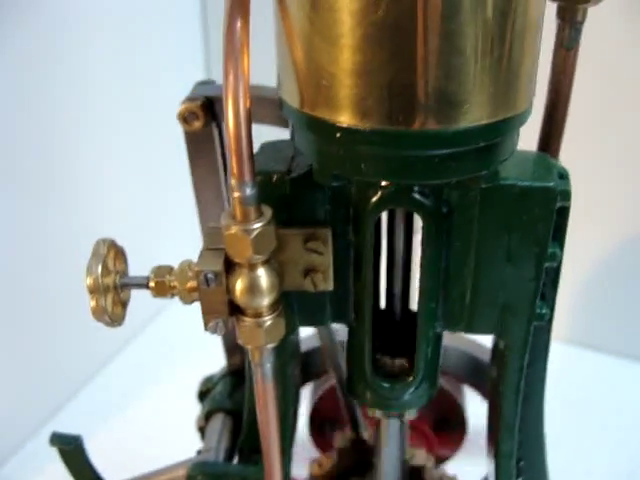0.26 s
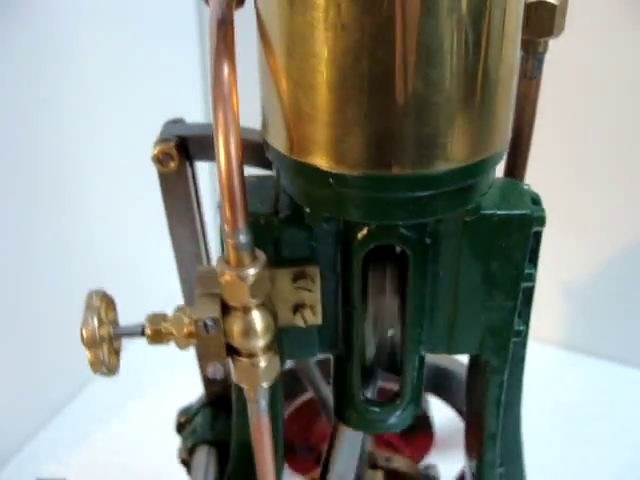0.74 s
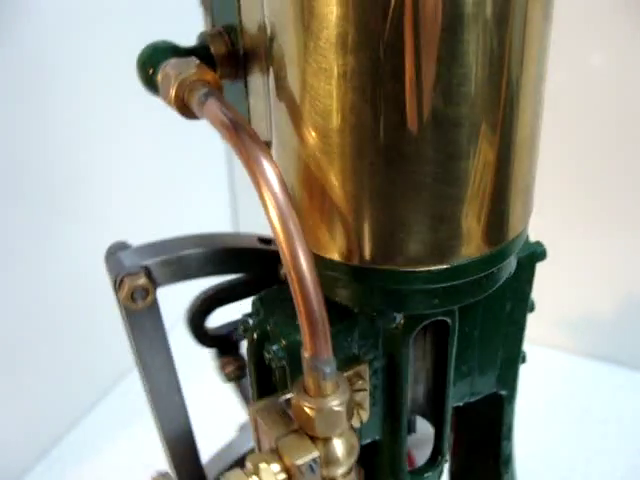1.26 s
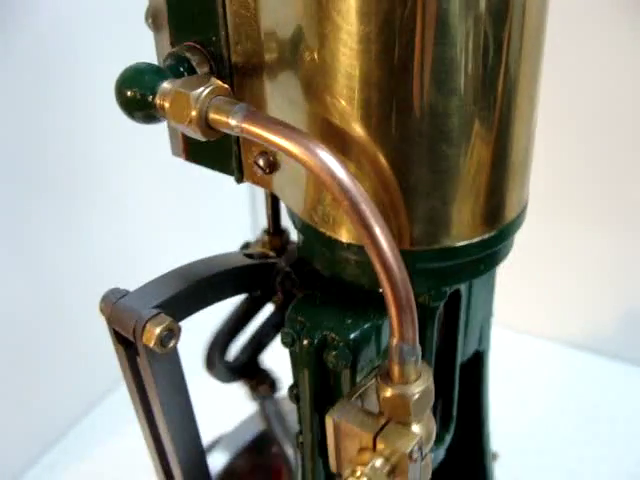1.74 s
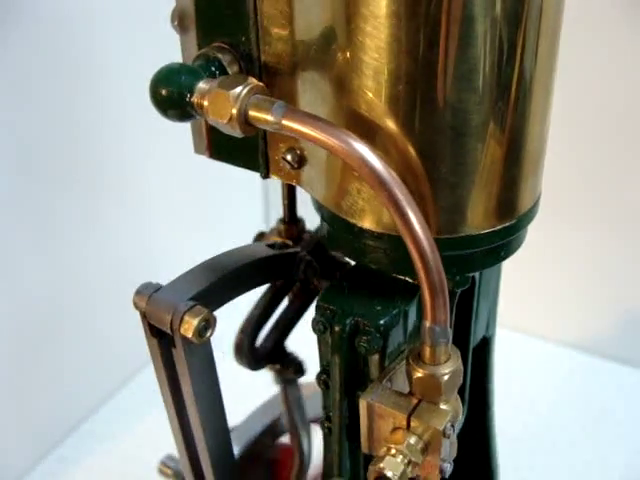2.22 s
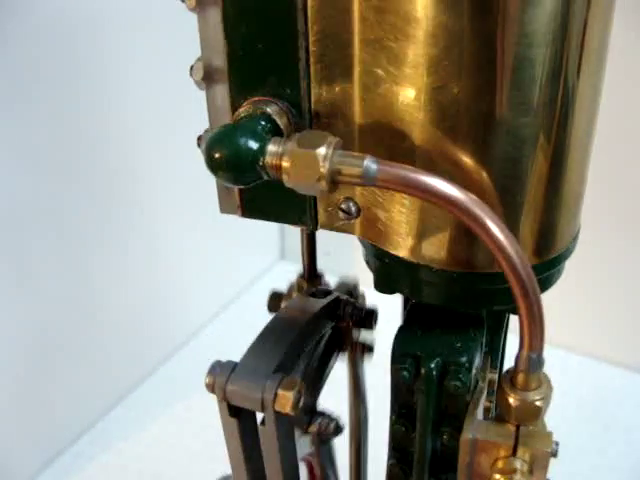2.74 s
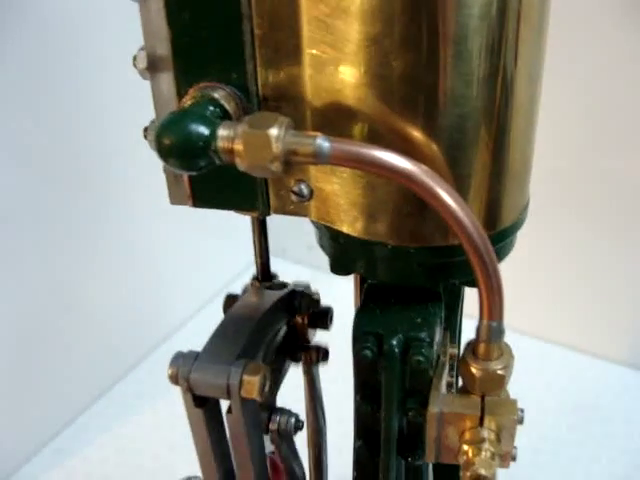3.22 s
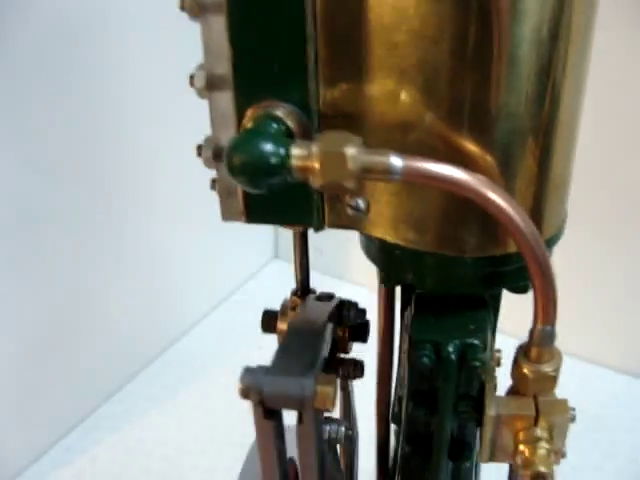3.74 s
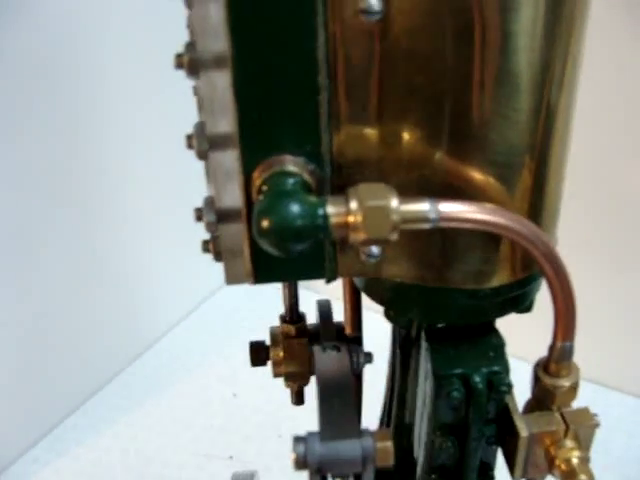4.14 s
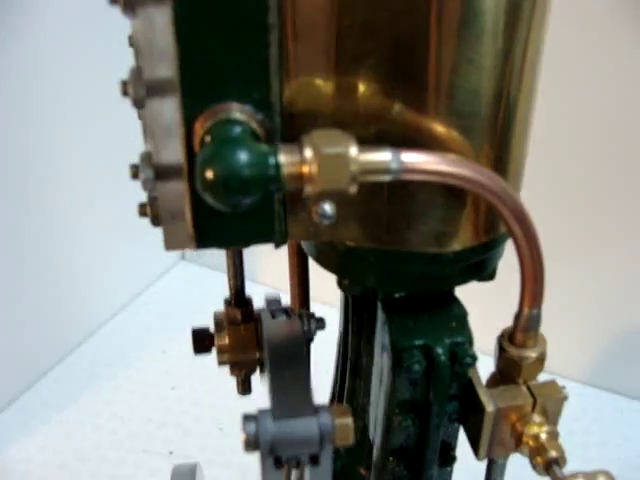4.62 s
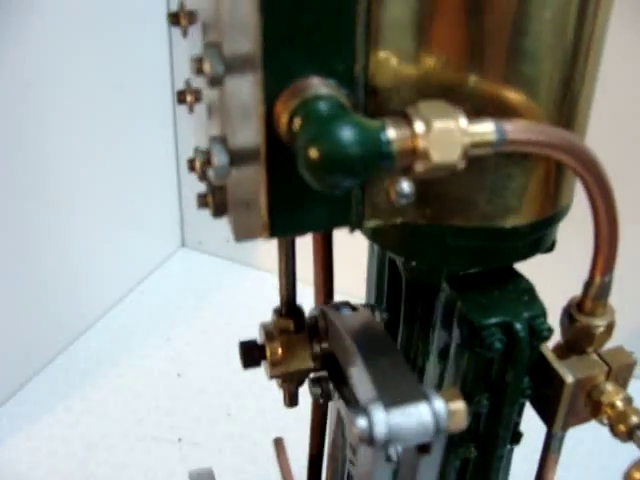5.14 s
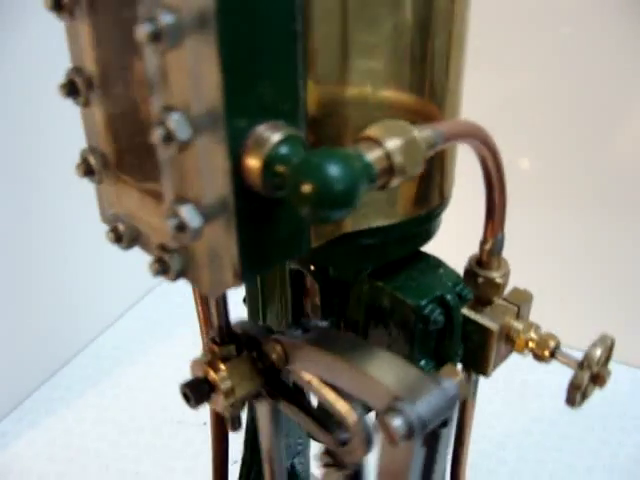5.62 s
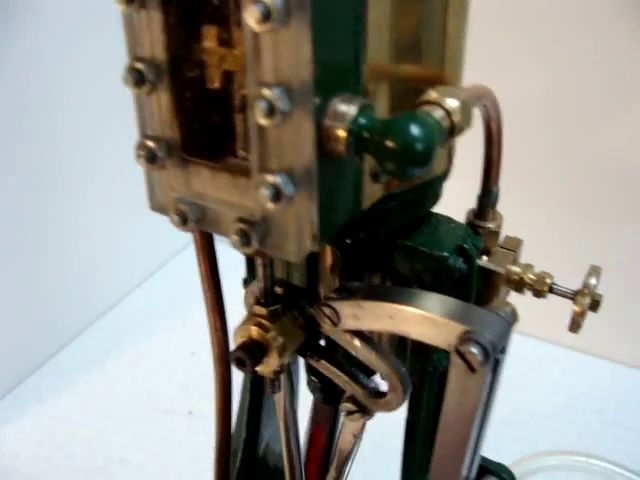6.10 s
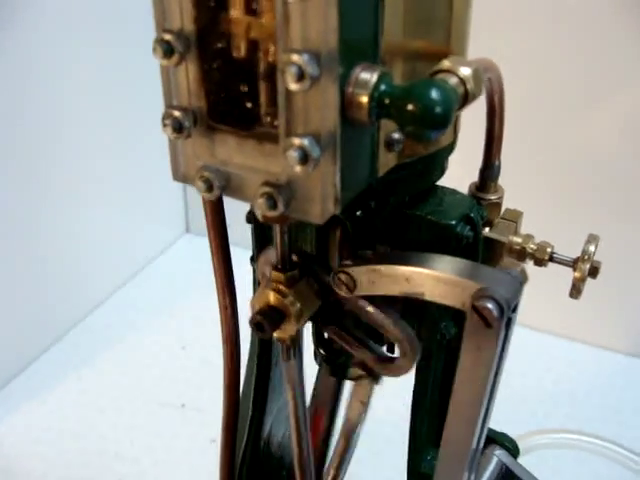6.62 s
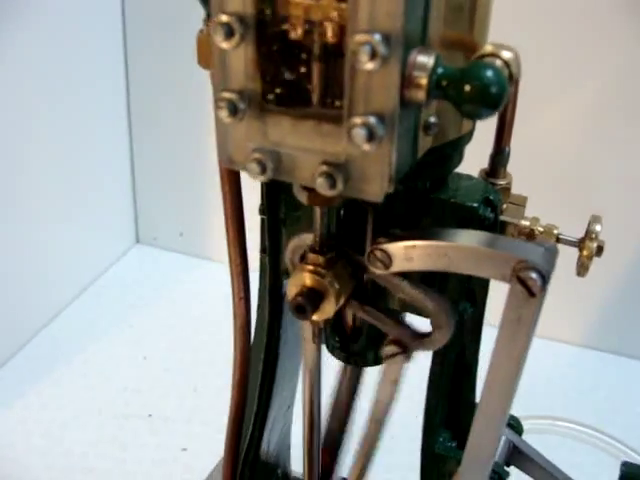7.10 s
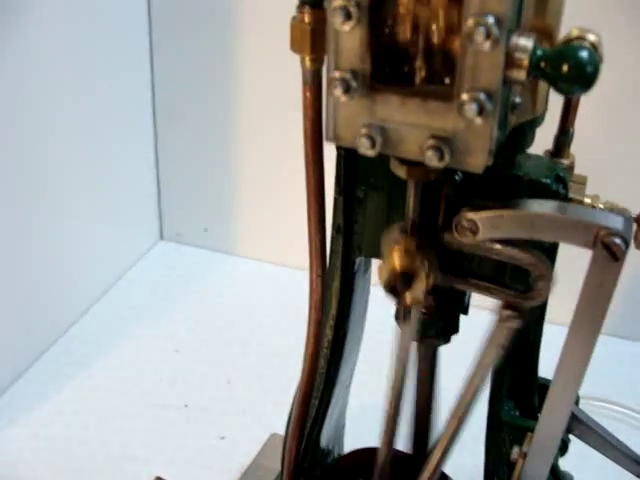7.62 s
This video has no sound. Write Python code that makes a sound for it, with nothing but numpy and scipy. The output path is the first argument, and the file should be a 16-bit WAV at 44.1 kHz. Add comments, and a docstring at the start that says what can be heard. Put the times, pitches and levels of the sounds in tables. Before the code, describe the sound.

From 0 to nearly 8 seconds a small model steam engine on compressed air runs without pause, about 3.7 turns a second. Every turn, roughly 0.27 seconds, has a sharp bright exhaust puff with a small knock, a swelling hiss, a dry metallic clack, then a thump and weaker puff about 0.1 seconds after the first, followed by another hiss. Lighter ticks and soft rubbing fill the gaps. A faint low bench drone is strongest in the first second. As the close microphone moves round, the air's colour shifts around 1.0-1.6 and again at 5.2-5.9 seconds. Soft handling rustles swell near 1.5, 2.6, 3.9 and 5.4, with a dull finger bump at about 2.4. The sharp puffs grow somewhat stronger towards the end. The indoor tail is short and dull; the engine is still running at the cut.

```python
"""Indoors, on a bench: a model vertical steam engine on compressed air, about 220 turns a minute, camera near.
Exhaust puffs, one sharp and one weak a turn, and stroke hiss: gated noise through air-passage resonances.
Clacks: noise bursts at fixed crank angles. Thumps and knocks: short pushes ringing decaying modes.
Sliding, frame rumble, bench drone and camera rustle: coloured noise. Fingers on the camera: ringing pushes.
The camera moves round to the valve chest; a short room tail follows the engine."""
import sys
import numpy as np
from scipy import signal
from scipy.fft import rfft, irfft
from scipy.io import wavfile
from scipy.ndimage import uniform_filter1d

SR = 44100
rng = np.random.default_rng(int(sys.argv[2]) if len(sys.argv) > 2 else 0)


def transcribe(signal):
    """Save signal, clipped to [-1, 1], as a 16-bit WAV file at the path in sys.argv[1]."""
    frames = np.atleast_2d(signal).T
    limited = np.clip(frames, -1, 1)
    pcm = np.round(limited * 32767).astype(np.int16)
    wavfile.write(sys.argv[1], SR, pcm)


N = 346626
TAPS = 4096
TIME = np.arange(N) / SR
BINS_HZ = np.maximum(np.arange(TAPS // 2 + 1) * SR / TAPS, 1)

# crank angles, in turns after the sharp puff
START_TURNS, CLACK_TURNS, THUMP_TURNS = .2357, .1954, .3976
# turn-to-turn spread of air flow and of blows
FLOW_SCATTER_DB, BLOW_SCATTER_DB = 0.66, 1.06
# return-stroke hiss against the first stroke
RETURN_DB = 0.02
# rustle between camera moves
RUSTLE_REST_DB = -47

# engine speed: time_s, speed_rpm
SPEED = [(0, 222.76), (1.1, 220.67), (4.8, 220.87), (6.3, 219.63), (6.9, 217.59), (7.86, 219.28)]
# camera position: time_s, position (0 front, 1 side, 2 valve chest; fades beyond 2)
VIEW = [(0, 0.32), (1.0, 0.16), (1.6, 0.98), (5.2, 1.23), (5.9, 1.92), (7.86, 2.35)]

# air passages under the puffs: centre_hz, width_hz, front_db, side_db, valve_chest_db
PUFF_RESONANCES = [(1413, 266, 7, 13, 9.5), (2045, 480, 18, 21, 10.5), (2608, 410, 12, 13, 20),
                   (3176, 260, 6.5, 15, 5), (3855, 66, 14.5, 7, 6), (4700, 300, 3, -5.5, -2),
                   (5150, 190, 3, 4.5, 5.5), (5510, 210, -1.5, 6.5, -18), (6420, 280, 6.5, 4.5, 1),
                   (7040, 310, 0.5, -2.5, -1), (7700, 170, 5.5, -6, -4)]
# air passages under the stroke hiss: centre_hz, width_hz, front_db, side_db, valve_chest_db
HISS_RESONANCES = [(1460, 330, 3, 9.7, 5.5), (2030, 290, 18.2, 16.8, 8), (2620, 244, 10.7, 11.3, 18),
                   (3165, 580, 5.3, 12.4, 7.9), (3864, 120, 12, 9.9, 11), (4446, 110, 14.7, 9.5, 9.5),
                   (4880, 490, 7.4, 1.2, 12.6), (5465, 710, 10.3, 13, 5.5), (5950, 226, 6.8, 0.77, 9.3),
                   (6650, 440, 3.3, 4.7, 5.1), (7020, 140, 4, 1.9, 4.5), (8200, 520, 4.1, 1.9, 6.8),
                   (9310, 370, 2.5, 4.1, 11.4), (9750, 140, 2.7, 6.1, 6.2)]
# broad puff spectrum: freq_hz, relative_db
PUFF_COLOUR = [(100, -31.5), (350, -15.5), (700, -12.5), (1000, -15), (1700, -20.5), (2500, -19.5),
               (4200, -7), (5800, 3), (7500, -3), (9900, -10.5)]
# broad hiss spectrum: freq_hz, relative_db
HISS_COLOUR = [(100, -15.5), (350, -17.5), (700, -29), (1000, -15), (1700, -12.5), (2500, -9), (4200, -8.5),
               (5800, -1.5), (7500, -2), (9900, -10.5)]
# sharp puff: time_s, level_db
SHARP_LEVEL = [(0, -16), (.75, -14), (2.3, -15.5), (3.3, -14), (4.55, -15), (5.3, -17), (6.45, -16.5),
               (7.86, -12)]
# weak puff: time_s, level_db
WEAK_LEVEL = [(0, -21.5), (1.3, -20.5), (1.7, -23), (4.6, -21), (4.95, -27), (6.3, -24), (6.6, -22),
              (7.86, -20.6)]
# stroke hiss: time_s, level_db
HISS_LEVEL = [(0, -20.5), (1.9, -22.5), (3.1, -21), (4.7, -22), (5.3, -23.5), (6.5, -23.5), (7.86, -19.5)]

# rubbing spectrum: freq_hz, relative_db
SLIDE_COLOUR = [(25, -35.5), (60, 1.5), (110, -11), (220, 8), (400, 1.5), (560, 13.5), (900, 6),
                (1700, 5.5), (2600, 8), (4200, 2.5), (6000, -44.5), (10000, -24.5)]
# rubbing parts: time_s, level_db
SLIDE_LEVEL = [(0, -45), (2.5, -41.5), (5, -43), (6, -45), (7.86, -42.5)]
# frame rumble spectrum: freq_hz, relative_db
FRAME_COLOUR = [(50, -22.0), (150, 0.5), (250, 4), (410, -4.5), (560, 9.5), (800, -2.5),
                (1500, -4.0), (4000, -25)]
# carry of the frame's ring to the camera, for knock and rumble: time_s, level_db
FRAME_LEVEL = [(0, -22), (.6, -30.5), (1.3, -30.5), (1.8, -25), (3.7, -23), (5.3, -21), (6, -23),
               (7.86, -23)]

# bench-top drone spectrum: freq_hz, relative_db
BENCH_COLOUR = [(30, -25.5), (80, -19.5), (101, -4.5), (122, -24), (185, -5), (223, -3), (260, -13.5),
                (600, -42.5)]
# bench-top drone: time_s, level_db
BENCH_LEVEL = [(0, -47.5), (.9, -50), (1.5, -57.5), (5.6, -56), (7.86, -58)]

# rustle spectrum: freq_hz, relative_db
RUSTLE_COLOUR = [(60, -36.5), (160, 2), (400, 3.5), (1100, 11), (1800, 11), (3600, 14), (5000, 12.5),
                 (7000, -9), (10000, -8)]
# rustle swells, one per camera move: peak_s, half_length_s (to 1/e), level_db
MOVES = [(1.502, 0.46, -40.5), (2.557, .25, -39.5), (3.887, .13, -34.5), (5.385, 0.33, -32)]

# frame and base ringing: freq_hz, t60_s, relative_db
THUMP_MODES = [(111, 0.031, -30), (168.5, 0.18, -21), (228.6, 0.095, 1), (282.5, 0.058, 9.5),
               (571, 0.084, 1.5)]
# knocked frame ringing: freq_hz, t60_s, relative_db
KNOCK_MODES = [(219, 0.077, -11), (307, 0.072, -2), (451, 0.032, 0), (536, 0.061, 7), (705, 0.04, -9.5),
               (920, .02, -11)]
# big end taking up play; also sets the bump and light knock: time_s, level_db
THUMP_LEVEL = [(0, -23.5), (.75, -26.5), (1.4, -24), (5.2, -22.5), (5.7, -24.5), (7.86, -26.5)]

# slack taken up in valve gear and crosshead: angle_turns, level_db (against the main clack)
CONTACTS = [(.158, -7), (CLACK_TURNS, 0), (.415, -11), (.63, -13)]
# clack spectrum: freq_hz, relative_db
CLACK_COLOUR = [(100, -19), (500, -10), (900, -0.5), (1600, 2.5), (2400, 6), (3200, 12.5), (4000, 3),
                (5200, 9), (6500, 6.5), (10000, -2)]
# valve gear clack: time_s, level_db
CLACK_LEVEL = [(0, -13.5), (2.8, -14.5), (3.5, -18), (3.8, -14.5), (7.86, -17.5)]

# fingers shifting on the camera body: time_s, level_db
GRIP = [(2.345, -34), (2.40, -33), (2.43, -48)]
# camera body ringing: freq_hz, t60_s, relative_db
GRIP_MODES = [(117, 0.13, -1), (158.6, 0.087, 6), (232, 0.043, 9), (353, 0.044, 1)]

# colour of the room tail: freq_hz, gain_db
WALL_COLOUR = [(100, 0), (2500, 5.5), (5000, -41.5), (10000, -14.5)]


def undb(db):
    """Decibels to gain."""
    return 10 ** (np.asarray(db) / 20)


def curve(rows):
    """Rows of (time_s, value) joined by straight lines."""
    return np.interp(TIME, *np.transpose(rows))


def colour(points):
    """Level in dB at every bin, linear over log frequency."""
    freq_hz, db = np.transpose(points)
    return np.interp(np.log(BINS_HZ), np.log(freq_hz), db)


def response(db):
    """Causal minimum-phase impulse response, by folding the cepstrum."""
    cepstrum = irfft(np.log(undb(db)))
    cepstrum[1:TAPS // 2] *= 2
    cepstrum[TAPS // 2 + 1:] = 0
    return irfft(np.exp(rfft(cepstrum)))


def unit(h):
    """Scale a response to unit energy."""
    return h / np.sqrt(np.sum(h ** 2))


def through(x, h):
    """Convolve a sound with a response."""
    return signal.oaconvolve(x, h)[:N]


def walk(rate_hz):
    """Smooth random wander of unit spread: held noise, box-smoothed."""
    hold = max(int(SR / rate_hz), 1)
    steps = np.repeat(rng.standard_normal(N // hold + 1), hold)
    wander = uniform_filter1d(steps, hold)[:N]
    return wander / wander.std()


def turbulence(flutter_db, rate_hz):
    """White noise whose strength flutters."""
    return rng.standard_normal(N) * undb(flutter_db * walk(rate_hz))


def add(out, start_s, sound):
    """Mix a short sound in at start_s."""
    i = int(start_s * SR)
    if 0 <= i < N:
        out[i:i + len(sound)] += sound[:N - i]


def crank():
    """Crank angle in turns: integrated speed, whole at each sharp puff."""
    return START_TURNS + np.cumsum(curve(SPEED)) / (60 * SR)


def each_turn(angle, at_turns, level):
    """Rows of (time_s, level_db): one blow per passage of at_turns, scattered round a level curve."""
    passes = np.arange(np.ceil(angle[0] - at_turns), angle[-1] - at_turns)
    time_s = np.interp(passes + at_turns, angle, TIME)
    scatter_db = BLOW_SCATTER_DB * rng.standard_normal(len(time_s))
    level_db = np.interp(time_s, *np.transpose(level)) + scatter_db
    return np.column_stack([time_s, level_db])


def port(angle, centre, opening, closing, steep, fade):
    """Flow rises and dies once a turn; first three settings in turns, steep and fade are flank exponents."""
    turn = np.round(angle - centre)
    offset = angle - centre - turn
    rise = np.abs(offset / opening) ** steep
    fall = np.abs(offset / closing) ** fade
    flow = np.exp(-np.where(offset < 0, rise, fall))
    scatter_db = FLOW_SCATTER_DB * rng.standard_normal(int(angle[-1]) + 2)
    return flow * undb(scatter_db[turn.astype(int)])


def passages(jet, points, resonances):
    """A jet rings the air passages; camera position blends the resonance heights."""
    view, out = curve(VIEW), 0
    centre_hz, width_hz, *views_db = np.transpose(resonances)
    bells = 1 / (1 + (2 * (BINS_HZ[:, None] - centre_hz) / width_hz) ** 2)
    for position, peak_db in enumerate(views_db):
        share = np.maximum(1 - np.abs(view - position), 0)
        heard = through(jet, unit(response(colour(points) + bells @ peak_db)))
        out = out + share * heard
    return out


def exhaust(angle):
    """Each cylinder end vents in a puff; the piston then pushes the rest out, fastest near mid-stroke."""
    sharp = port(angle, centre=-.004, opening=.024, closing=.033, steep=4.2, fade=2)
    weak = port(angle, centre=.413, opening=.012, closing=.026, steep=2.6, fade=2.4)
    first = port(angle, centre=.215, opening=.102, closing=.114, steep=2.2, fade=3.1)
    second = port(angle, centre=.695, opening=.121, closing=.117, steep=2.7, fade=3.1)
    puff_jet = turbulence(flutter_db=.7, rate_hz=700)
    stroke_jet = turbulence(flutter_db=.9, rate_hz=450)
    puffs = undb(curve(SHARP_LEVEL)) * sharp + undb(curve(WEAK_LEVEL)) * weak
    strokes = undb(curve(HISS_LEVEL)) * (first + undb(RETURN_DB) * second)
    puff_sound = passages(puffs * puff_jet, PUFF_COLOUR, PUFF_RESONANCES)
    hiss_sound = passages(strokes * stroke_jet, HISS_COLOUR, HISS_RESONANCES)
    return puff_sound + hiss_sound


def sliding(angle, loaded_db, rumble_db):
    """Crosshead and eccentrics rub all the time; the frame rumbles while the crosshead is loaded."""
    friction = turbulence(flutter_db=1.2, rate_hz=160)
    rub = through(friction, unit(response(colour(SLIDE_COLOUR)))) * undb(curve(SLIDE_LEVEL))
    first = port(angle, centre=0.2176, opening=0.029, closing=0.15, steep=5.4, fade=1.3)
    second = port(angle, centre=.745, opening=0.021, closing=0.037, steep=2.4, fade=1.2)
    load = undb(loaded_db) * first + undb(rumble_db) * second
    shaking = load * undb(curve(FRAME_LEVEL)) * rng.standard_normal(N)
    return rub + through(shaking, unit(response(colour(FRAME_COLOUR))))


def bench():
    """Base vibration, as steady noise, keeps low bench-top resonances sounding."""
    drone = through(rng.standard_normal(N), unit(response(colour(BENCH_COLOUR))))
    return drone * undb(curve(BENCH_LEVEL))


def rustle():
    """Soft broad noise with a bell-shaped swell for each camera move."""
    swell = undb(RUSTLE_REST_DB)
    for peak_s, half_s, level_db in MOVES:
        swell = swell + undb(level_db) * np.exp(-((TIME - peak_s) / half_s) ** 2)
    rubbing = turbulence(flutter_db=2.2, rate_hz=210)
    return through(rubbing, unit(response(colour(RUSTLE_COLOUR)))) * swell


def blows(events, modes, gain_db, lead_s, push_s, chatter):
    """Cushioned blows: a chattering push rings slightly detuned modes; each blow is set by its peak."""
    out, t = np.zeros(N), TIME[:2 * TAPS]
    for time_s, level_db in events:
        push = t / push_s * np.exp(-t / push_s) * (1 + chatter * rng.standard_normal(len(t)))
        detune = 1 + .012 * rng.standard_normal(len(modes))
        ring = np.zeros(len(t))
        for (freq_hz, t60_s, mode_db), ratio in zip(modes, detune):
            decay = np.exp(-np.log(1000) * t / t60_s)
            ring += undb(mode_db) * decay * np.cos(2 * np.pi * freq_hz * ratio * t)
        blow = signal.fftconvolve(push, ring)[:len(t)]
        add(out, time_s - lead_s, undb(level_db + gain_db) * blow / np.abs(blow).max())
    return out


def bearings(angle):
    """Load reverses twice a turn: bump and knock at the sharp puff, thump and light knock near the weak."""
    knocks = each_turn(angle, 0, FRAME_LEVEL)
    bumps = each_turn(angle, 0, THUMP_LEVEL)
    thumps = each_turn(angle, THUMP_TURNS, THUMP_LEVEL)
    # negative lead: the push starts after the angle is passed
    bump = blows(bumps, THUMP_MODES, gain_db=-10.5, lead_s=.012, push_s=.001, chatter=.4)
    knock = blows(knocks, KNOCK_MODES, gain_db=0.5, lead_s=-0.0011, push_s=0.00025, chatter=0.54)
    thump = blows(thumps, THUMP_MODES, gain_db=0, lead_s=0.0023, push_s=0.00056, chatter=.7)
    light_knock = blows(thumps, KNOCK_MODES, gain_db=-9, lead_s=-0.00077, push_s=0.00023, chatter=0.64)
    return bump + knock + thump + light_knock


def valve_gear(angle, contact_s, tail_db, tail_s):
    """Links and pins take up slack at fixed crank angles: one dry clack and lighter ticks, as noise bursts."""
    out, t = np.zeros(N), TIME[:TAPS]
    hit = t / contact_s * np.exp(1 - t / contact_s)  # peaks at contact_s
    envelope = hit + undb(tail_db) * np.exp(-t / tail_s)
    for at_turns, contact_db in CONTACTS:
        for time_s, level_db in each_turn(angle, at_turns, CLACK_LEVEL):
            burst = envelope * rng.standard_normal(TAPS)
            add(out, time_s - contact_s, undb(level_db + contact_db) * burst)
    return through(out, unit(response(colour(CLACK_COLOUR))))


def grip():
    """Shifting fingers push roughly on the camera body and ring it."""
    return blows(GRIP, GRIP_MODES, gain_db=6, lead_s=0.0047, push_s=0.0056, chatter=7.2)


def room(x, wet_db, t60_s):
    """A small, well damped room returns a short dull tail: decaying noise, coloured by the walls."""
    t = TIME[:4 * TAPS]
    decay = np.exp(-np.log(1000) * t / t60_s)
    tail = rng.standard_normal(len(t)) * decay * (t > .006)  # first return after 6 ms
    walls = response(colour(WALL_COLOUR))
    return x + undb(wet_db) * through(through(x, unit(tail)), walls)


def scene():
    """Engine in the room, plus bench, rustle and the hand on the camera."""
    angle = crank()
    engine = exhaust(angle) + sliding(angle, loaded_db=-13, rumble_db=-18.5) + bearings(angle)
    engine = engine + valve_gear(angle, contact_s=0.001102, tail_db=-23, tail_s=0.0047)
    return (room(engine, wet_db=-12, t60_s=0.23) + bench() + rustle() + grip())[None]


def record(dry):
    """The small microphone loses the deep bass; the camera cuts the top steeply."""
    bass_cut = signal.butter(2, 43, "high", fs=SR, output="sos")
    top_cut = signal.ellip(12, .2, 75, 10080, fs=SR, output="sos")  # 0.2 dB ripple, 75 dB stop, 10080 Hz
    return signal.sosfilt(top_cut, signal.sosfilt(bass_cut, dry))


dry = scene()
out = record(dry)
transcribe(out)
```